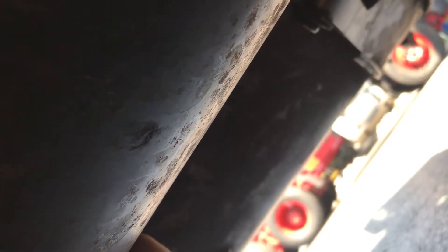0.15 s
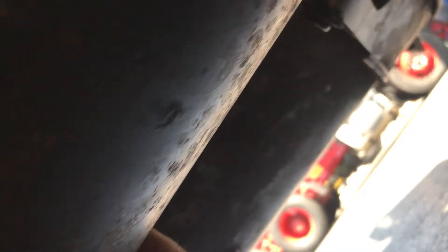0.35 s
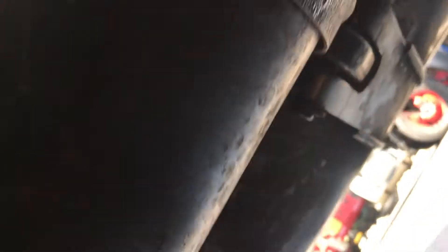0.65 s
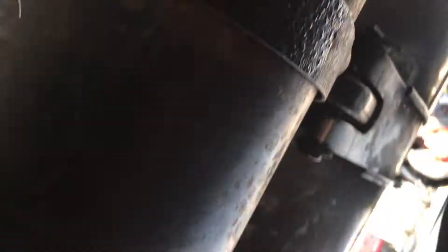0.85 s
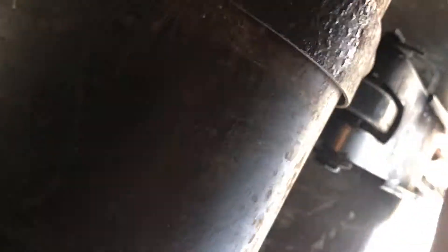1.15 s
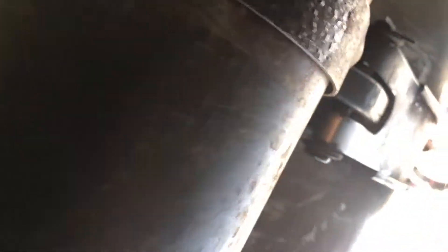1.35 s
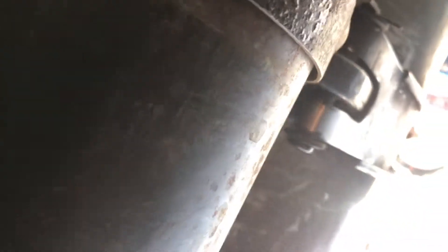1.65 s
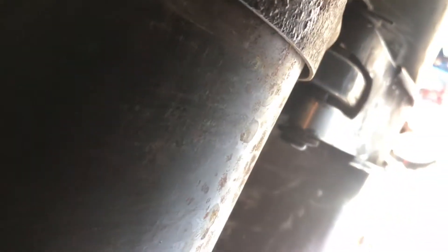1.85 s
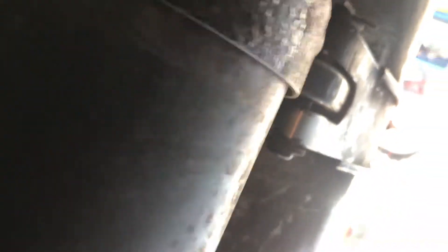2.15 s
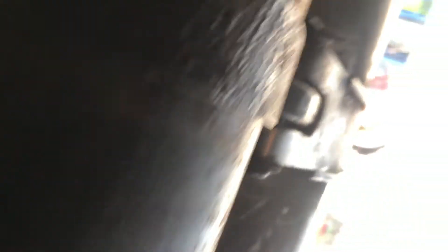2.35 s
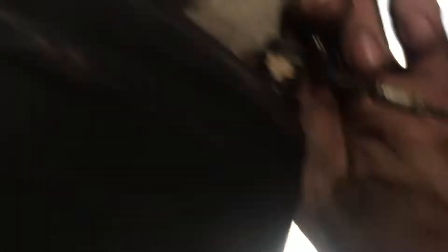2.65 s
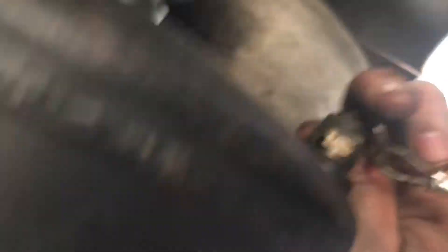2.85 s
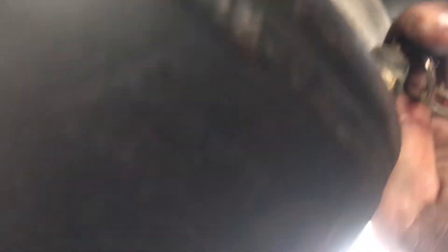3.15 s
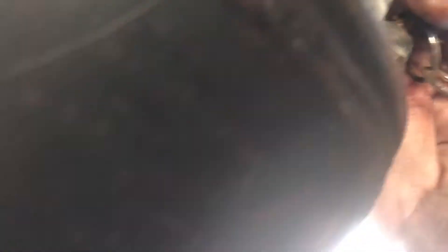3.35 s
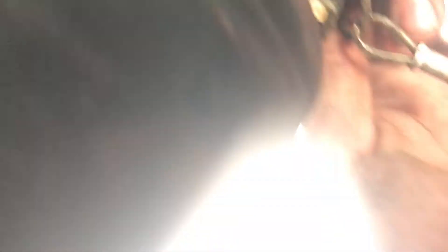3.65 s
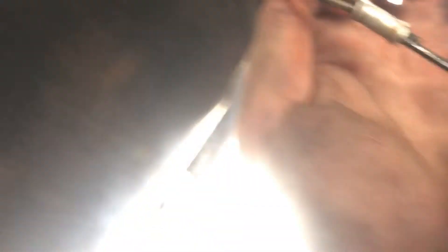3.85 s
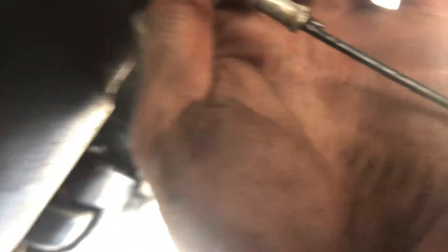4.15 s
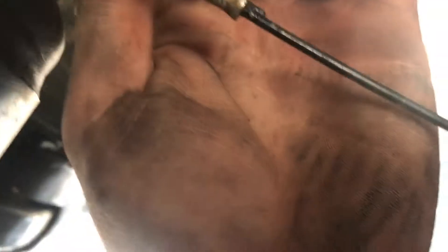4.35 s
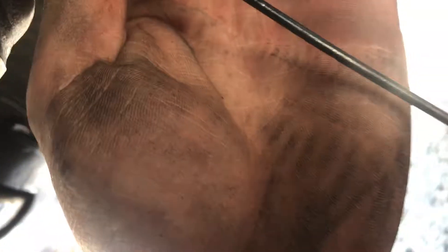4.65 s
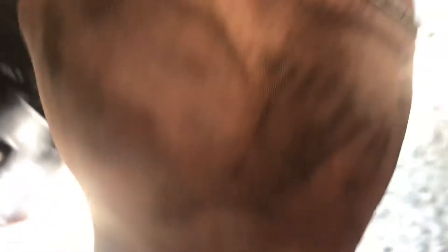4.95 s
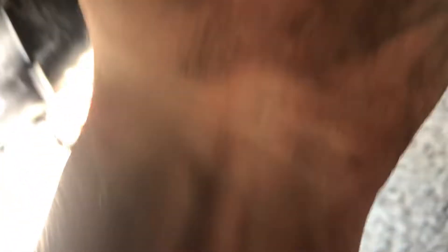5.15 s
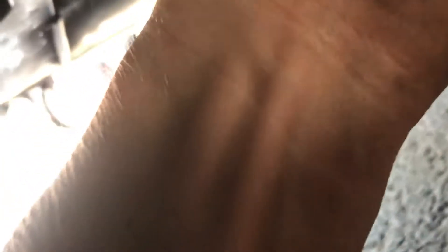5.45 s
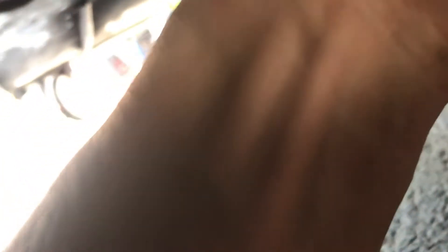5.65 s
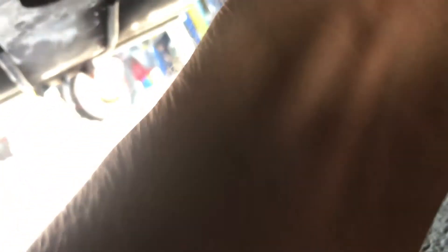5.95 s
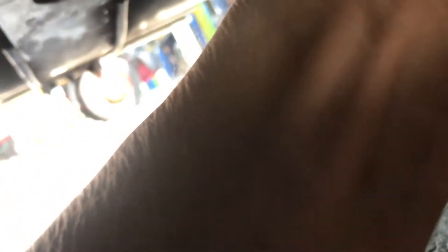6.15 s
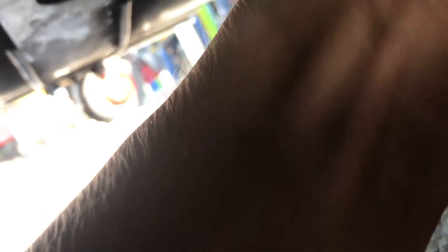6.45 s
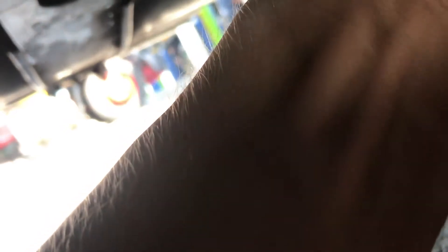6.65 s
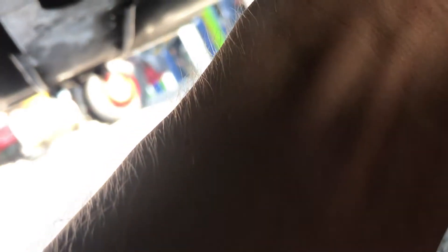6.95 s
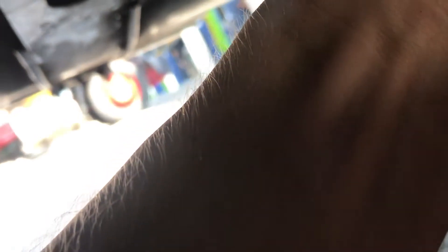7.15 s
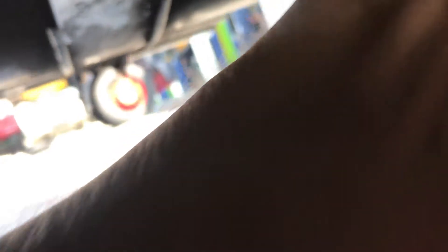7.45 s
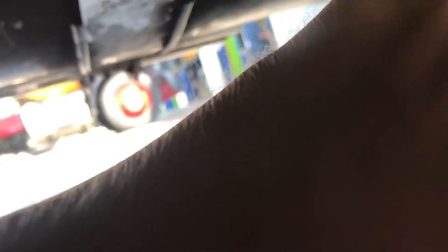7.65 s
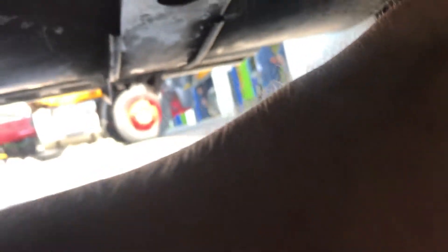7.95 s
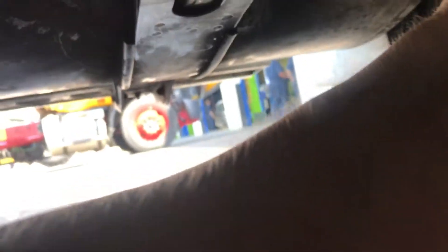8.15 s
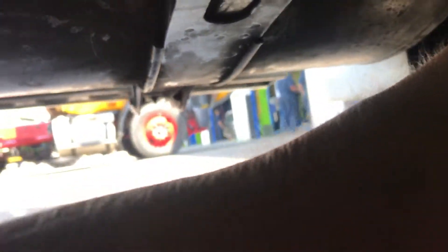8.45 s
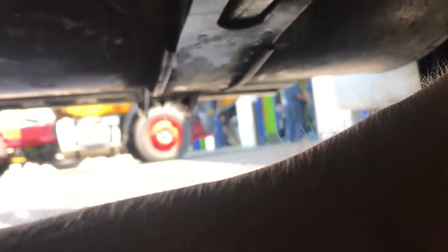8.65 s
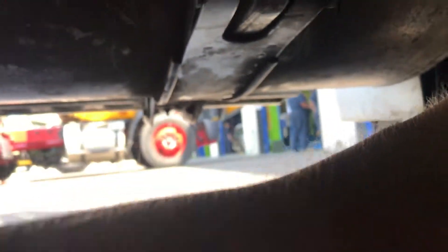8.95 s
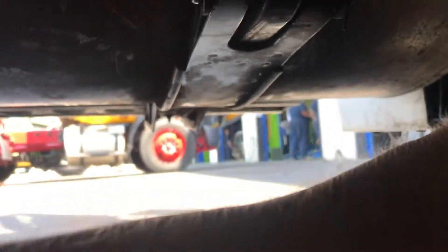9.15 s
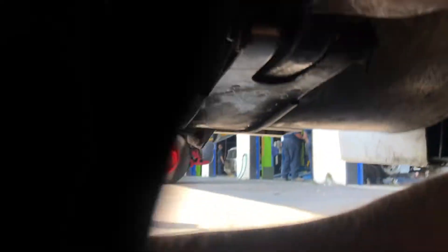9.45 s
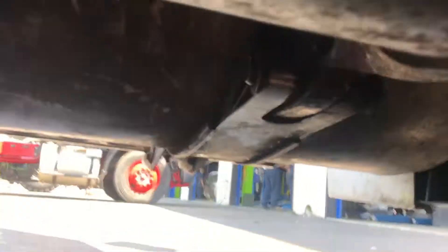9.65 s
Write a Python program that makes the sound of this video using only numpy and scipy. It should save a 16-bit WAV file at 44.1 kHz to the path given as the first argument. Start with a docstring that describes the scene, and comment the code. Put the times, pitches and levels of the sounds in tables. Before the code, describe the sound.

Compressed air hisses loudly from a truck tank's drain valve, cuts out for over a second, spits, then blasts steadily over faint engine idle.

```python
"""An air jet hisses under a truck, stops, spits and blows again as a hand pulls a tank's drain valve by its cable.
The jet is turbulent noise; reflections from tank, hand and arm comb it, so its colour sweeps as they move.
While the valve is shut a faint leak seeps past its seat, and handling bumps are short low pushes.
An idling engine, harmonics of its firing rate over a throbbing rumble, stands out whenever the jet stops."""
import sys
import numpy as np
from scipy import signal
from scipy.fft import rfft, irfft, next_fast_len
from scipy.io import wavfile
from scipy.ndimage import uniform_filter1d, map_coordinates

SR = 44100
rng = np.random.default_rng(int(sys.argv[2]) if len(sys.argv) > 2 else 0)


def log_audio(samples):
    """Write samples as a 16-bit WAV file to the path given in sys.argv[1]."""
    # one column per channel
    frames = np.atleast_2d(samples).T
    # limit to full scale, then quantise
    limited = np.clip(frames, -1, 1)
    pcm = np.round(limited * 32767).astype(np.int16)
    wavfile.write(sys.argv[1], SR, pcm)


N = 431722


def amp(db):
    """Logarithmic level: decibels to an amplitude ratio."""
    return 10 ** (np.asarray(db) / 20)


def unit(x):
    """Normalisation: x at an rms of 1."""
    return x / np.sqrt(np.mean(x ** 2) + 1e-20)


def seconds():
    """Sampling: the time of every sample."""
    return np.arange(N) / SR


def along(points, hz):
    """Spectral interpolation: (Hz, value) points joined on a logarithmic frequency axis."""
    f, v = np.transpose(points)
    return np.interp(np.log(hz + 1), np.log(f + 1), v)


def curves(rows):
    """Linear interpolation in time: one curve for each column after the time."""
    s, *columns = np.transpose(rows)
    return [np.interp(seconds(), s, column) for column in columns]


def wobble(rate):
    """Slow random modulation: a smooth curve through random knots, rate of them a second."""
    knots = rng.standard_normal(int(N * rate / SR) + 4)
    return map_coordinates(knots, [seconds() * rate])


def filtered(x, response):
    """Linear filtering: the spectrum of x times a response of frequency."""
    size = next_fast_len(N + SR // 4)
    hz = np.fft.rfftfreq(size, 1 / SR)
    return irfft(rfft(x, size) * response(hz), size)[..., :N]


def noise(colour_db):
    """Spectral shaping: random noise of rms 1 whose relative spectrum in dB is a function of frequency."""
    return unit(filtered(rng.standard_normal(N), lambda hz: amp(colour_db(hz))))


def echoes(x, paths, low_hz, high_hz):
    """Reflection: a copy for each (delay s, strength); long waves bend round, the shortest scatter."""
    reflected = filtered(x, lambda hz: hz ** 2 / (hz ** 2 + low_hz ** 2) / (1 + (hz / high_hz) ** 2))
    # four times the sampling rate, so that delays can glide between samples
    fine = signal.resample_poly(reflected, up=4, down=1)
    fine_s = np.arange(len(fine)) / (4 * SR)
    return sum(strength * np.interp(seconds() - delay, fine_s, fine) for delay, strength in paths)


TOP_HZ = 15740  # middle of the final roll-off


def in_band(hz):
    """Band limiting: the response falls from 1 to 0 across 100 Hz."""
    return np.clip((TOP_HZ - hz) / 100 + .5, 0, 1)


# Level of the open jet at the swaying microphone, before flutter and the valve's flow.
# Each row: time in seconds, level in dB.
HISS_LEVEL = [(0.2, -20.5), (1.88, -20), (1.905, -21.5), (1.95, -18.5), (1.98, -17), (2.05, -17),
              (2.09, -20), (2.16, -22.5), (2.52, -22.5), (2.62, -20.5), (2.78, -22.5), (2.93, -22.5),
              (3.06, -24), (3.3, -24), (3.37, -25), (3.65, -21.5), (3.92, -25), (4.04, -25.5), (4.1, -23.5),
              (4.7, -22.5), (4.8, -23), (5.03, -21.5), (5.15, -23.5), (5.5, -21.5), (7.35, -21.5),
              (8.1, -23), (8.85, -24), (9.05, -21.5), (9.35, -23), (9.47, -20), (9.55, -21)]


def jet():
    """Jet noise: turbulent air, coloured by direction and reflection, then scaled by the valve's flow."""
    shaded = aimed(turbulence())
    air = chassis(mirrored(shaded), drift_s=.00002, count=12)
    # even out the power over a tenth of a second before the levels are set
    power = np.abs(uniform_filter1d(air ** 2, size=SR // 10))
    air = air / np.sqrt(power)
    level_db, = curves(HISS_LEVEL)
    flutter_db = 0.5 * wobble(25) + 0.33 * wobble(250)
    return air * valve() * amp(level_db + flutter_db)


# Pulls on the valve's cable.
# Each row: opening starts in seconds, fully shut in seconds, opening time in seconds,
# closing time in seconds, level of the open flow in dB.
PULLS = [(-0.1, 0.452, 0.02, 0.06, -2.5), (1.786, 1.842, 0.022, 0.027, -4), (1.832, 9.561, 0.038, 0.016, 0)]
# the hiss lingers under the truck, and longer but fainter in the yard: time constants, level of the latter
RING_S, TAIL_S, TAIL_DB = 0.0051, 0.021, -17.5


def valve():
    """Flow control: flow rises evenly, holds and falls as the spring shuts; exponential decays linger."""
    t = seconds()
    flow = 0
    for start, shut, opening, closing, db in PULLS:
        openness = np.clip(np.minimum((t - start) / opening, (shut - t) / closing), 0, 1)
        flow = flow + amp(db) * openness

    def linger(time_constant):
        keep = np.exp(-1 / (time_constant * SR))
        return signal.lfilter([1 - keep], [1, -keep], flow, zi=flow[:1])[0]

    return np.hypot(linger(RING_S), amp(TAIL_DB) * linger(TAIL_S))


# Relative colour of the open jet.
# Each row: frequency in Hz, spectral density in dB per Hz.
JET = [(200, -27.5), (480, -25), (700, -20.5), (1500, -11.5), (2300, -7), (3900, -12), (5600, -8),
       (7500, -7.5), (9600, -3), (10400, -9), (11200, -4.5), (13000, -1.5), (15600, -1)]
# Gaps between hand, tank and frame, each ringing with the jet or swallowing it.
# Each row: half open in seconds, half closed in seconds, centre in Hz with the arm at rest,
# width in Hz at rest between the points of quarter dB, gain in dB before POCKET_DEPTH,
# octaves risen as the arm's path halves.
POCKETS = [(-0.2, 0.35, 2270.0, 420.0, -5.7, 0.9), (-0.2, 0.6, 3000, 160, 5.5, 0),
           (-0.2, 0.6, 3300, 170, 6, 0), (-0.2, 0.6, 7300, 500, 3.5, 0), (-0.2, 0.6, 8450, 600, -4.5, 0),
           (-0.2, 0.6, 10600, 700, -5, 0), (0.14, 2.27, 4350.0, 500.0, -5.2, 0.0),
           (0.16, 2.3, 9150.0, 1040.0, -4.5, 0.0), (0.4, 5.13, 1130.0, 250.0, 3.3, 0.0),
           (0.48, 2.4, 6610.0, 490.0, 5.5, 0.4), (2.2, 2.7, 14400, 3500, -3.5, 0),
           (2.52, 2.74, 3150, 1000, 4, 0), (2.52, 2.88, 9600, 1100, 3.5, 0), (2.7, 3.55, 11050, 900, -4, 0),
           (3.8, 4.03, 7550, 800, -5, 0), (3.85, 4.06, 11500, 1200, -3.5, 0), (2.7, 4.0, 5600, 450, 3.5, 0),
           (2.74, 3.05, 1100.0, 1060.0, -5.3, 0.0), (2.78, 4.81, 3710.0, 160.0, 4.6, 0.1),
           (2.86, 7.6, 3030.0, 330.0, -4.8, 0.4), (3.21, 3.84, 6730.0, 1020.0, -5.6, 0.1),
           (3.85, 8.63, 3470.0, 640.0, 3.7, 0.9), (4.2, 5.0, 2400, 900, 2.5, 0),
           (4.26, 5.08, 5950.0, 430.0, -7.2, 0.9), (4.26, 9.68, 4500.0, 380.0, 3.2, 0.0),
           (5.12, 9.51, 1800.0, 370.0, -4.3, 0.3), (5.15, 9.57, 2210.0, 290.0, -4.8, 0.4),
           (5.26, 9.45, 11690.0, 760.0, -5.3, 0.0), (5.3, 7.41, 3530.0, 240.0, -5.1, 0.9),
           (5.79, 9.58, 6460.0, 580.0, -6.6, 0.4), (5.88, 7.87, 4720.0, 470.0, -7.0, 0.8),
           (6.54, 8.53, 8140.0, 990.0, 3.0, 0.0), (6.9, 7.6, 2400, 450, 3, 0),
           (7.38, 9.4, 3510.0, 290.0, -4.2, 0.0), (7.44, 9.71, 3850.0, 240.0, 4.2, 0.0),
           (7.49, 7.85, 6920.0, 470.0, -7.8, 0.8), (7.75, 9.68, 1800.0, 190.0, 4.7, 0.8),
           (7.95, 8.3, 10350, 700, 4.5, 0), (7.95, 8.45, 14250, 1100, 4, 0),
           (8.45, 9.6, 11350, 450, -6, 0.5), (8.5, 9.4, 5800, 600, 3, 0), (8.55, 9.45, 12650, 600, -8, 1.0),
           (8.8, 9.6, 11250, 650, -4, 0), (8.3, 9.38, 4040.0, 470.0, -5.8, 1.0),
           (8.38, 9.52, 2710.0, 370.0, -7.8, 0.3), (8.85, 9.73, 5150.0, 530.0, -6.5, 0.0),
           (9.0, 9.8, 2600, 170, 2.5, 0), (9.35, 9.8, 4600, 350, 4, 0)]
POCKET_DEPTH, POCKET_FADE_S = 1.12, 0.25  # factor on every gap's dB; time a gap takes to open or close
ARM_REST_MS = 0.915  # extra travel time by way of the arm at rest


def turbulence():
    """Resonance and absorption: broad jet noise marked by gaps that rise in pitch as the arm narrows them."""
    hz, t, z = signal.stft(noise(lambda hz: along(JET, hz)), SR, nperseg=1024)
    arm_s, arm_ms, _ = np.transpose(ARM)
    narrowing = ARM_REST_MS / np.interp(t, arm_s, arm_ms)
    for opens, closes, centre, width, db, glide in POCKETS:
        openness = np.clip(np.minimum(t - opens, closes - t) / POCKET_FADE_S + .5, 0, 1)
        rest_hz = hz[:, None] / narrowing ** glide
        detune = 2 * (rest_hz - centre) / width
        z = z * amp(POCKET_DEPTH * db * openness / (1 + detune ** 2) ** 2)
    marked = signal.istft(z, nperseg=1024)[1][:N]
    return filtered(marked, in_band)


# Rasp and fizz against the top sizzle, as the hand shades the jet.
# Each row: time in seconds, rasp in dB, fizz in dB.
SHADE = [(0.2, 5, -1), (1.88, 0.5, 1.5), (2.01, 0.5, -4.5), (2.5, -2, -5), (2.63, -1.5, -3),
         (2.76, -2.3, -4.5), (2.86, 5, 2.5), (2.95, 2.5, 7), (3.08, 1.5, -5.5), (3.86, 4.5, -1),
         (4.02, 3.5, 0), (4.1, 1.5, 3), (5.02, 3, 2.5), (5.53, -2.5, -2), (7.77, -2, -3), (8.1, 0, 2.7),
         (9.49, -1, -1.5)]
# Extra roar as the valve opens or is throttled shut.
# Each row: start in seconds, extra roar in dB before rise and fade, fade time constant in seconds.
RUSHES = [(-0.1, 2, 0.7), (0.4, 6, 0.1), (1.82, 3, 0.29), (9.52, 6, 0.11)]
RUSH_RISE_S = 0.025
ROAR_HZ, RASP_HZ, FIZZ_HZ, SIZZLE_HZ = 2230, 4600, 7900, 13300  # band centres
ROAR_DB, ROAR_FOLLOWS = -0.7, 0.61  # roar against the sizzle; dB of roar per dB of fizz


def aimed(x):
    """Directivity: big eddies roar, smaller ones rasp and fizz, each size spreading in its own directions."""
    centres = [ROAR_HZ, RASP_HZ, FIZZ_HZ, SIZZLE_HZ]
    bands = []
    for share in np.eye(len(centres)):
        points = list(zip(centres, share))
        bands.append(filtered(x, lambda hz: along(points, hz)))
    rasp_db, fizz_db = curves(SHADE)
    t = seconds()
    rush_db = 0
    for s, db, fade in RUSHES:
        rise = np.clip((t - s) / RUSH_RISE_S, 0, 1)
        rush_db = rush_db + db * rise * np.exp(-np.abs(t - s) / fade)
    roar_db = ROAR_DB + ROAR_FOLLOWS * fizz_db + rush_db
    return sum(amp(db) * band for db, band in zip([roar_db, rasp_db, fizz_db, 0], bands))


# Near surfaces that mirror the jet; in all four tables negative strengths invert, as edges do.
# The forearm closes in on the microphone in two moves. Each row: time in seconds,
# extra travel time in ms, strength from -1 to 1 before SURFACE_DB.
ARM = [(0.25, 1.311, 0.1), (1.91, 1.214, 0.05), (2.75, 1.26, 0.16), (3.2, 1.175, 0.12), (3.8, 1.25, 0.12),
       (4.1, 1.18, 0.1), (4.6, 1.125, 0.18), (4.96, 1.1, 0.26), (5.33, 0.997, 0.38), (5.6, 0.978, 0.38),
       (5.8, 0.935, 0.4), (6.1, 0.92, 0.42), (7.36, 0.915, 0.35), (7.72, 0.83, 0.28), (8.45, 0.795, 0.32),
       (8.62, 0.755, 0.15), (9.44, 0.776, 0.2)]
# The palm, closest of all, cups the valve. Each row: time in seconds, extra travel time in ms,
# strength from -1 to 1 before SURFACE_DB.
PALM = [(0.2, 0.267, 0.39), (2.01, 0.359, -0.24), (2.77, 0.256, 0.27), (3.02, 0.261, 0.24),
        (3.45, 0.264, 0.31), (3.73, 0.246, 0.16), (4.08, 0.189, 0.55), (4.96, 0.163, 0.58),
        (5.36, 0.086, 0.04), (5.58, 0.211, 0.1), (7.35, 0.193, 0.1), (7.67, 0.24, -0.15),
        (7.84, 0.278, 0.31), (8.56, 0.223, 0.11), (9.42, 0.209, -0.05)]
# The tank's wall, hidden while the hand is in the way. Each row: time in seconds,
# extra travel time in ms, strength from -1 to 1 before SURFACE_DB.
TANK = [(0.28, 0.547, 0.35), (1.89, 0.543, 0.4), (2.61, 0.505, 0.06), (2.77, 0.725, 0.13),
        (3.21, 0.722, 0.48), (3.74, 0.739, 0.5), (4.25, 0.66, 0.08), (5.11, 0.639, -0.26),
        (5.46, 0.638, 0.3), (6.04, 0.581, 0.47), (7.41, 0.581, 0.39), (7.7, 0.497, -0.22),
        (8.4, 0.485, -0.66), (8.8, 0.519, -0.4), (9.52, 0.536, -0.6)]
# The fingers round the cable. Each row: time in seconds, extra travel time in ms,
# strength from -1 to 1 before SURFACE_DB.
FINGERS = [(0.29, 0.45, 0.09), (2.06, 0.462, 0.1), (2.42, 0.463, 0.14), (2.89, 0.47, -0.32),
           (3.14, 0.392, -0.2), (3.8, 0.372, -0.17), (4.11, 0.374, 0.1), (4.93, 0.326, 0.11),
           (5.19, 0.429, -0.08), (6.04, 0.358, 0.15), (7.26, 0.384, 0.13), (7.67, 0.373, 0.06),
           (8.15, 0.435, 0.21), (8.74, 0.44, 0.02), (9.49, 0.485, 0.01)]
# The band each surface throws back. Each row: path table, lower edge in Hz, upper edge in Hz.
SURFACES = [(ARM, 1290, 10000), (PALM, 3150, 11900), (FINGERS, 1075, 14750), (TANK, 1910, 6100)]
SURFACE_DB = 2.4  # how hard the surfaces are: gain on all their echoes


def mirrored(x):
    """Comb filtering: close reflections interfere with the hiss; the teeth rise as a path shortens."""
    out = x
    for path, low_hz, high_hz in SURFACES:
        delay_ms, strength = curves(path)
        out = out + amp(SURFACE_DB) * echoes(x, [(delay_ms / 1000, strength)], low_hz, high_hz)
    return out


# strength of each far echo; its shortest and longest delay in seconds before any movement
CHASSIS_STRENGTH, CHASSIS_S = 0.08, (0.0013, 0.0055)


def chassis(x, drift_s, count):
    """Multipath: weak frame and ground echoes drift as the microphone sways and glide as it moves with the arm."""
    arm_ms, _ = curves(ARM)
    travel = (arm_ms - ARM_REST_MS) / 1000
    sway = drift_s * wobble(0.83)
    paths = []
    for _ in range(count):
        delay = rng.uniform(*CHASSIS_S) + rng.uniform(.5, 1) * travel + rng.standard_normal() * sway
        paths.append((delay, rng.choice([-1, 1]) * CHASSIS_STRENGTH))
    return x + echoes(x, paths, low_hz=1300, high_hz=22000)


# Puffs from the shut valve.
# Each row: start in seconds, level in dB, time to fall by 60 dB in seconds.
SPITS = [(1.303, -33, 0.081), (1.447, -60, 0.014)]
# Relative colour of a puff. Each row: frequency in Hz, spectral density in dB per Hz.
SPIT = [(400, -22), (1200, 2), (3000, -2), (6000, -1), (7500, -12), (9500, -41), (15500, -23)]


def spits():
    """Impulsive release: a tick of the valve stem and a puff of air, both decaying exponentially."""
    out = np.zeros(N)
    for s, db, t60 in SPITS:
        age = np.maximum(seconds() - s, 0)
        puff = amp(-60 * age / t60) * noise(lambda hz: along(SPIT, hz))
        tick = amp(-4.0 - 60 * age / 0.0053) * rng.standard_normal(N)
        out += (age > 0) * amp(db) * (puff + tick)
    return out


# Level of the shut valve's leak, before its wobble. Each row: time in seconds, level in dB.
LEAK_LEVEL = [(0.5, -67), (0.65, -62.5), (1.15, -65.5), (1.27, -80), (1.5, -75), (1.6, -71), (1.77, -68),
              (9.6, -81), (9.68, -87), (9.79, -72)]
# Relative colour of the leak. Each row: frequency in Hz, spectral density in dB per Hz.
LEAK = [(2000, -22), (5000, -11), (7000, -5), (7800, -13), (8900, -3), (9700, -6), (10400, -15),
        (11500, -1), (13100, -5), (14300, 1), (15600, -6)]
# The seat sings thinly as the cable tightens. Its one row: start in seconds, end in seconds,
# centre in Hz, width in Hz between the points 6 dB down, level in dB before its wobble.
LEAK_WHISTLE = (1.5, 1.86, 14600, 800, -66)
WHISTLE_RISE_S = 0.08  # the song swells in and out this slowly


def leak():
    """Leakage noise: air seeps past the valve's seat, with a thin narrow-band song around its opening."""
    level_db, = curves(LEAK_LEVEL)
    seep = amp(level_db + 1.2 * wobble(13)) * noise(lambda hz: along(LEAK, hz))
    start, end, centre, width, db = LEAK_WHISTLE
    t = seconds()
    tension = np.clip(np.minimum(t - start, end - t) / WHISTLE_RISE_S, 0, 1)
    song = noise(lambda hz: -20 * np.log10(1 + (2 * (hz - centre) / width) ** 2))
    return seep + amp(db + 1.5 * wobble(20)) * tension * song


# Soft handling bumps. Each row: centre in seconds, envelope peak in dB, frequency in Hz,
# time from the centre to 1/e of the envelope in seconds.
BUMPS = [(.5, -34, 85, .012), (0.625, -36, 55, .02), (0.688, -34, 100, .014), (0.747, -34, 65, .018),
         (0.793, -28, 75, 0.0068), (.89, -31, 125, .012), (1.099, -28.5, 136, 0.013),
         (1.488, -18, 170, 0.0022), (1.594, -37, 50, .025), (3.644, -35, 75, 0.011),
         (3.668, -40.5, 190, 0.011), (9.756, -33.5, 203, .012)]


def bumps():
    """Transient excitation: each bump is a short low sine under a Gaussian envelope."""
    t = seconds()
    out = np.zeros(N)
    for s, db, hz, width in BUMPS:
        envelope = np.exp(-((t - s) / width) ** 2)
        out += amp(db) * envelope * np.sin(2 * np.pi * hz * (s - t))
    return out


# Level of the idling engine's drone, before the gains below. Each row: time in seconds, level in dB.
DRONE = [(0.0, -46.5), (0.4, -45), (0.52, -38.5), (0.61, -34.5), (1.0, -35.5), (1.45, -35.5), (1.93, -36.5),
         (2.13, -45), (2.51, -45), (2.56, -54), (2.75, -50), (3.43, -48), (7.99, -46.5), (9.68, -41),
         (9.79, -36.5)]
# Harmonic lines, relative to one another. Each row: multiple of the firing rate, level in dB,
# change in dB over the microphone's whole move.
ORDERS = [(1, -5.5, 0.5), (2, -4.5, 4.5), (3, 0.5, -1), (4, 3.5, -4), (5, -6, -2), (7, -8, 5),
          (8, -11.5, 7), (9, -20.5, 0)]
# Relative colour of engine and yard noise. Each row: frequency in Hz, spectral density in dB per Hz.
RUMBLE = [(22, -36), (38, -19), (60, -1), (100, -8.5), (140, -5), (220, -6.5), (360, -4.5), (480, -11),
          (800, -14), (1400, -19.5), (2200, -25), (3800, -31.5), (5200, -42), (8000, -48), (15500, -57)]
FIRING_HZ = 49.4  # mean rate
HUM_DB, RUMBLE_DB = -2.5, -2.5  # lines and rumble against the drone's level
# the deepest boom rises and falls less than the drone: its upper edge, its level, dB per dB of drone
BOOM_HZ, BOOM_DB, BOOM_FOLLOWS = 100, 1.5, 0.8
MOVE_S = (4.5, 12.7)  # the microphone moves along the truck; the sound ends before the move does
SURGE_DB, SURGES_PER_S = 1.1, 12  # typical size and knot rate of the rumble's uneven swells


def engine():
    """Periodic excitation: firing harmonics and throbbing rumble; the deepest boom swings less than the rest."""
    level_db, = curves(DRONE)
    moved = np.interp(seconds(), MOVE_S, [0, 1])
    firing_hz = FIRING_HZ * (1 + 0.002 * wobble(2))
    phase = 2 * np.pi * np.cumsum(firing_hz) / SR
    hum = np.zeros(N)
    for k, db, change_db in ORDERS:
        line = np.sin(round(k) * phase + rng.uniform(0, 2 * np.pi))
        hum += amp(db + change_db * moved + wobble(2.97)) * line
    throb = 1 + 0.055 * np.cos(phase)
    rumble = noise(lambda hz: along(RUMBLE, hz)) * throb * amp(SURGE_DB * wobble(SURGES_PER_S))
    drone = amp(HUM_DB) * unit(hum) + amp(RUMBLE_DB) * unit(rumble)
    boom = filtered(drone, lambda hz: 1 / (1 + (hz / BOOM_HZ) ** 4))
    usual_db = np.median(level_db)
    boom_db = usual_db + BOOM_DB + BOOM_FOLLOWS * (level_db - usual_db)
    return amp(level_db) * (drone - boom) + amp(boom_db) * boom


def scene():
    """Superposition: all sources add at one microphone, heard alike on both sides."""
    mono = jet() + leak() + engine() + spits() + bumps()
    return np.array([mono, mono])


def record(dry):
    """Band limiting: nothing passes above the top of the band."""
    return filtered(dry, in_band)


dry = scene()
out = record(dry)
log_audio(out)
```